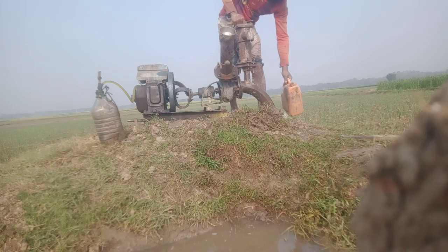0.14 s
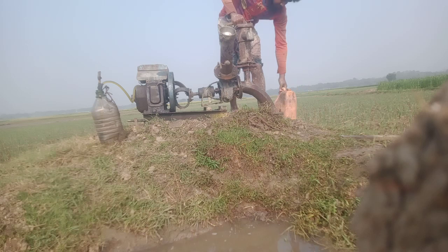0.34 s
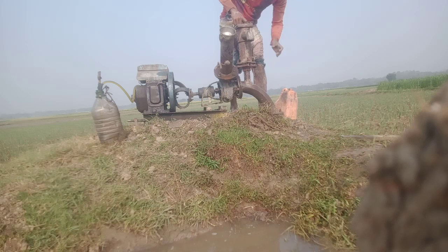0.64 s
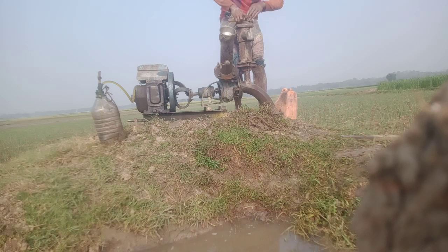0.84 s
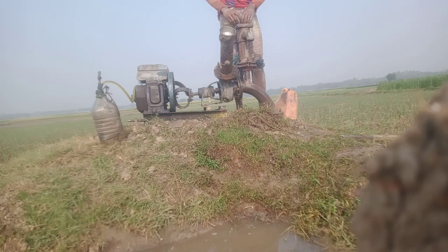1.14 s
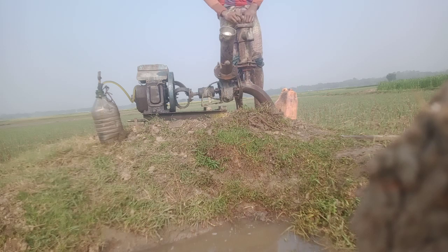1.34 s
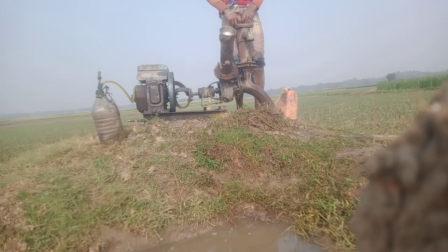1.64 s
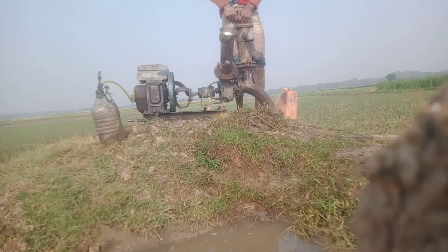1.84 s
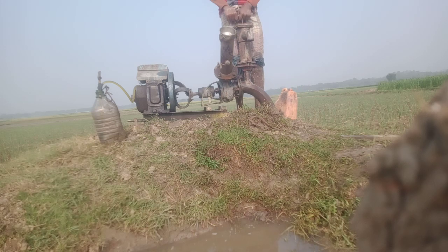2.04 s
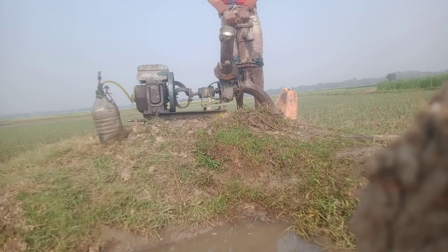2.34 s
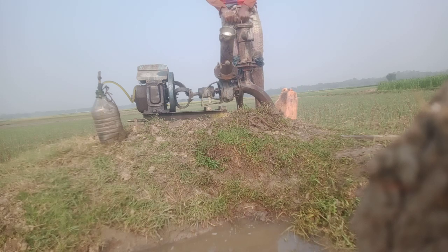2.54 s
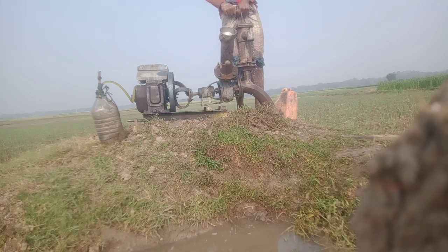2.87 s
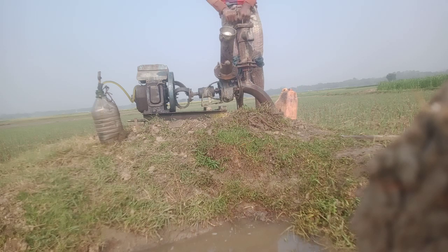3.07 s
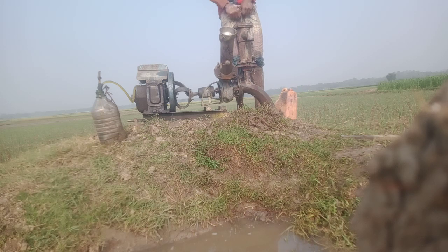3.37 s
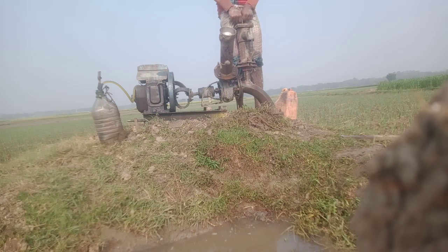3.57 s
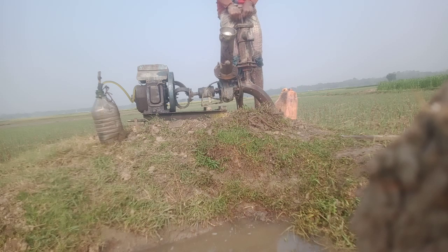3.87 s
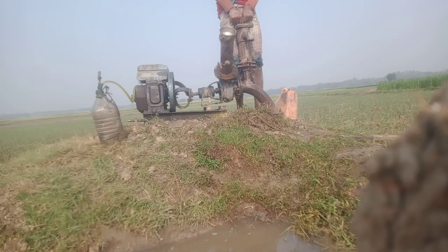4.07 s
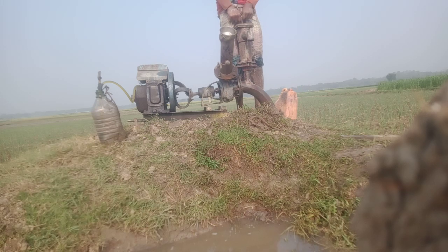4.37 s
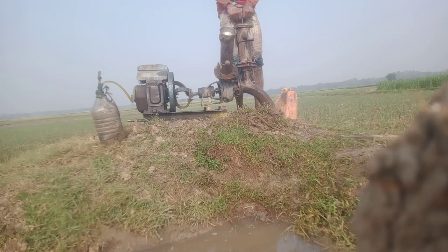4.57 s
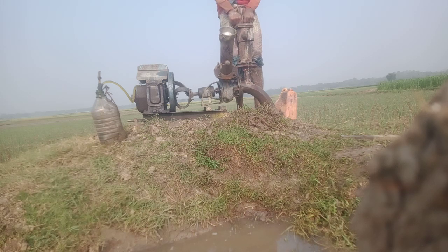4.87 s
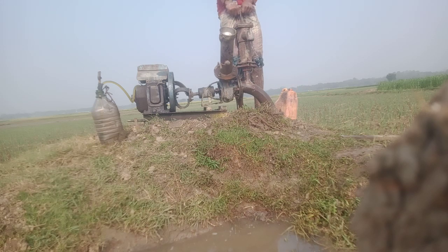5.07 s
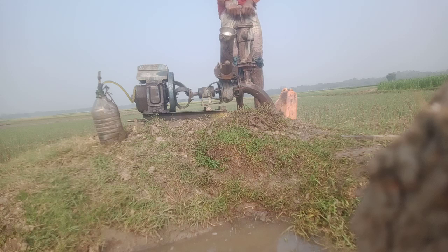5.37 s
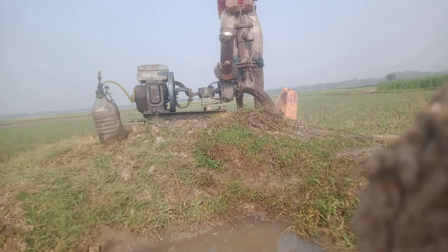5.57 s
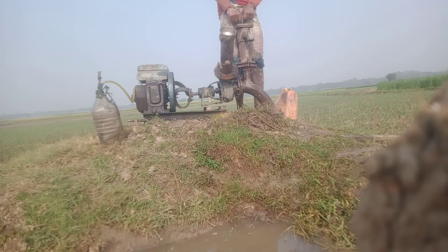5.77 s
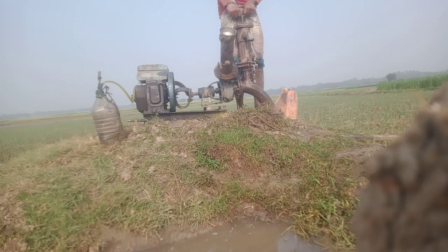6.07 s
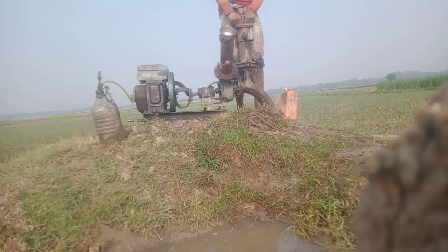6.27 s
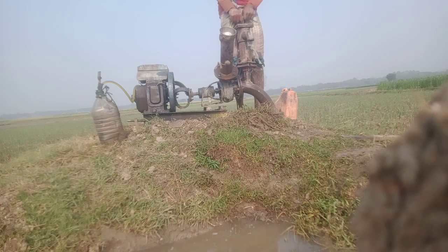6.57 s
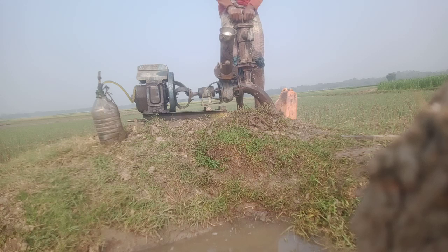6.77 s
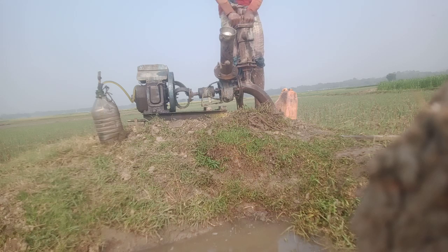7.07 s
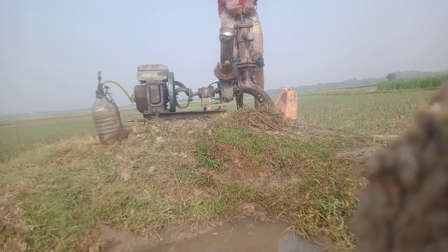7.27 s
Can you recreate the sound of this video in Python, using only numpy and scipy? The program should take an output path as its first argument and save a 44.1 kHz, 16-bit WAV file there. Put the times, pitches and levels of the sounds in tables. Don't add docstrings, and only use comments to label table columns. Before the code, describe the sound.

A dry, open field heard through a phone microphone a few metres from a loose iron hand pump. At 0 s a hard metal clink lands, followed by small ticks until 0.2 s. Until 1.8 s it is mostly quiet: soft wind rumble, faint hush, thin rising bird whistles around 0.3 and 1.1-1.3 s, and occasional clinks near 0.75, 0.85, 1.06 and 1.45 s. From about 1.85 s pumping starts and continues briskly, roughly four strokes a second. Each stroke mixes clanking handle and pins, rattling iron, a hollow low note sliding upward, a short airy hiss and a dull valve thump. Brief water bubbles chirp through it. Wind swells around 4.4 s. Clanks grow heavier from 4.8 s, with strong hits near 5.5 and 7.15 s, a scrape around 5.9 s, and rising gurgles at 5.8, 6.25 and 7.2 s. The pumping is still going at 7.4 s.

```python
import sys
import numpy as np
from scipy import signal
from scipy.fft import rfft, irfft, next_fast_len
from scipy.io import wavfile
from scipy.ndimage import uniform_filter1d

SR = 44100
rng = np.random.default_rng(int(sys.argv[2]) if len(sys.argv) > 2 else 0)


def convert_level_to_amplitude(level_db):
    exponent = np.asarray(level_db, float) / 20
    return 10 ** exponent


def bounce(signal):
    frames = np.transpose(np.atleast_2d(signal))
    limited = np.clip(frames, -1, 1)
    pcm = np.round(limited * 32767).astype(np.int16)
    wavfile.write(sys.argv[1], SR, pcm)


N = 327215
PUMPING_FROM = 1.8


def evened(x):
    return x / np.sqrt(np.mean(x ** 2) + 1e-20)


def coloured(x, points):
    hz, db = np.transpose(points)
    size = next_fast_len(len(x))
    log_hz = np.log(np.fft.rfftfreq(size, 1 / SR) + 1)
    gain = convert_level_to_amplitude(np.interp(log_hz, np.log(hz), db))
    return evened(irfft(rfft(x, size) * gain, size)[:len(x)])


def add(mix, s, sound):
    part = mix[round(s * SR):][:len(sound)]
    part += sound[:len(part)]


def resonate(x, hz, width):
    turn = np.exp(2j * np.pi * np.cumsum(hz * np.ones(len(x))) / SR)
    r = np.exp(-np.pi * width / SR)
    smooth = signal.lfilter([1 - r], [1, -r], x / turn + 1e-18)
    return 2 * (turn * smooth).real


def lumps(seconds):
    size = round(seconds * SR)
    once = uniform_filter1d(rng.standard_normal(N), size)
    return evened(uniform_filter1d(once, size))


def span(t, start, stop, rise, fall):
    return np.interp(t, [start - rise, start, stop - fall, stop + fall], [0, 1, 1, 0])


def glide(start, stop, first_hz, last_hz, width, clean=0.69):
    t = np.arange(round((stop - start) * SR)) / SR
    done = t / (stop - start)
    hz = first_hz + (last_hz - first_hz) * done
    flow, surge = rng.standard_normal((2, len(t)))
    flow = flow * convert_level_to_amplitude(4 * evened(uniform_filter1d(surge, 600)))
    rough = evened(resonate(resonate(flow, hz, width), hz, 5.4 * width))
    steady = np.sin(2 * np.pi * np.cumsum(hz) / SR)
    return evened(rough + clean * steady) * np.sin(np.pi * done ** .6) ** .7


def swell(t, rise_s, t60):
    return (1 - np.exp(-(t / rise_s) ** 2)) * convert_level_to_amplitude(-60 * t / max(t60, .02))


def shank(contact, hz):
    return signal.lfilter([1], np.r_[1, np.zeros(int(SR / hz)), -.72], contact)


# [t/s, rattle level/dB, wind level/dB]
WORK = [(0, -34.5, -42), (.24, -65, -49.5), (.4, -54.5, -47.5), (.55, -60, -48.5), (1.0, -58, -45.5),
        (1.3, -59, -51), (1.66, -71.5, -41.5), (1.82, -56, -44.5), (1.899, -37, -47.5), (3, -39.5, -46.5),
        (4.4, -40, -35), (4.899, -38, -47), (7.42, -40, -55)]


def work(column):
    rows = np.array(WORK)
    return convert_level_to_amplitude(np.interp(np.arange(N) / SR, rows[:, 0], rows[:, column]))


# [f/Hz, level/dB]
WIND = [(30, -38.5), (60, -14), (110, -1.5), (190, -9), (280, -15.5), (450, -107)]
# [f/Hz, level/dB]
AIR = [(620, -43), (950, -15.5), (1420, -7.5), (2600, -8.5), (4500, -17.5), (9000, -42.5)]
AIR_DB = -64.5


def wind():
    rumble = coloured(rng.standard_normal(N) * convert_level_to_amplitude(6.1 * lumps(0.012)), WIND) * work(column=2)
    hush = coloured(rng.standard_normal(N), AIR) * convert_level_to_amplitude(3.5 * lumps(.03))
    whistle_hz = 2900 + 500 * lumps(.1)
    whistle = evened(resonate(resonate(hush, whistle_hz, 200), whistle_hz, 200))
    return rumble + convert_level_to_amplitude(AIR_DB) * (hush + .35 * whistle)


# [start t/s, stop t/s, first f/Hz, last f/Hz, level/dB]
BIRDS = [
    (0.196, 0.296, 3380, 3370, -69),
    (.32, 0.402, 2100, 2830, -62),
    (1.104, 1.195, 3290, 4700, -64),
    (1.186, 1.273, 2820, 3800, -61.5),
    (1.606, 1.68, 3020, 3640, -71),
    (1.688, 1.735, 7000, 8000, -75),
]


def birds():
    out = np.zeros(N)
    for start, stop, first_hz, last_hz, db in BIRDS:
        add(out, start, convert_level_to_amplitude(db) * glide(start, stop, first_hz, last_hz, 120, .8))
    return out


# [start t/s, stop t/s, first f/Hz, last f/Hz, level/dB]
POCKETS = [(1.883, 1.949, 847, 1027, -41), (1.965, 2.016, 1260, 1360, -53), (2.327, 2.429, 478, 635, -45),
           (2.793, 2.853, 521, 610, -37), (3.044, 3.122, 504, 635, -39), (3.587, 3.656, 492, 676, -46),
           (4.118, 4.183, 595, 947, -37.5), (4.395, 4.436, 685, 760, -40.5), (4.542, 4.629, 875, 982, -40),
           (4.975, 5.038, 850, 1030, -41), (5.079, 5.16, 992, 844, -44), (5.152, 5.238, 440, 740, -36),
           (5.236, 5.324, 849, 1000, -40), (5.342, 5.414, 530, 680, -38), (5.462, 5.506, 560, 690, -39.5),
           (6.327, 6.375, 616, 746, -38.5), (6.328, 6.442, 880, 1000, -39), (6.732, 6.797, 857, 600, -43),
           (6.843, 6.903, 754, 933, -31.5)]


def pockets():
    out = np.zeros(N)
    for start, stop, first_hz, last_hz, db in POCKETS:
        add(out, start, convert_level_to_amplitude(db) * glide(start, stop, first_hz, last_hz, 52, 0.82))
    return out


# [start t/s, stop t/s, first f/Hz, last f/Hz, level/dB]
GURGLES = [
    (5.793, 5.854, 632, 939, -28),
    (6.234, 6.298, 760, 874, -37),
    (7.145, 7.228, 691, 1010, -33.5),
    (7.215, 7.304, 347, 574, -39.5),
    (7.316, 7.473, 372, 587, -39),
]


def gurgles():
    out = np.zeros(N)
    for start, stop, first_hz, last_hz, db in GURGLES:
        add(out, start - .01, convert_level_to_amplitude(db) * glide(start, stop, first_hz, last_hz, 42, 2.0))
    return out


# [f/Hz, level/dB]
PUFF = [(1500, -30), (2700, -3), (5200, -17), (9000, -30), (11000, -37), (15600, -33)]
# [start t/s, stop t/s, level/dB]
PUFFS = [(1.888, 2, -50), (2.047, 2.12, -54), (2.192, 2.25, -54), (2.43, 2.534, -55.5), (2.544, 2.592, -51),
         (2.648, 2.712, -52.5), (2.876, 2.93, -58), (3.151, 3.31, -55), (3.359, 3.516, -56.5),
         (3.625, 3.659, -46.5), (3.897, 3.974, -59.5), (4.144, 4.213, -55), (4.396, 4.494, -54),
         (4.692, 4.794, -56), (4.957, 5.072, -53.5), (5.26, 5.32, -57.5), (5.536, 5.676, -56),
         (5.86, 5.937, -53), (6.105, 6.15, -61), (6.376, 6.478, -54), (6.624, 6.71, -56),
         (6.884, 6.975, -54.5), (7.15, 7.236, -55.5)]


def puffs():
    level, t = np.zeros(N), np.arange(9000) / SR
    for start, stop, db in PUFFS:
        add(level, start, convert_level_to_amplitude(db + 1.5 - 41 * t) * span(t, 0.0011, stop - start, 0.001, 0.017))
    hiss = coloured(rng.standard_normal(N), PUFF) * convert_level_to_amplitude(4.95 * lumps(0.0041))
    return convert_level_to_amplitude(6.0) * level * hiss


# [t/s, peak level/dB, f/Hz]
THUMPS = [(2.053, -22, 125), (2.311, -14, 203), (2.538, -15, 129), (2.776, -12.5, 180), (2.926, -14.5, 76),
          (3.013, -15, 159), (3.902, -18.5, 181), (4.052, -9.5, 148), (4.275, -21, 157),
          (4.844, -15.5, 170), (5.117, -12.5, 162), (5.397, -12.5, 137), (5.68, -19, 173),
          (5.953, -11.5, 136), (6.231, -14, 131), (6.498, -11.5, 139), (6.774, -10.5, 143),
          (7.049, -8, 154), (7.318, -6.5, 163.5)]


def valve():
    out, t = np.zeros(N), np.arange(5000) / SR
    for s, db, hz in THUMPS:
        shape = (1 - np.exp(-(t / 0.0043) ** 2)) * np.exp(-t / 0.006)
        add(out, s - .003, convert_level_to_amplitude(db + 3.5) * shape * np.sin(2 * np.pi * hz * t))
    return signal.sosfilt(signal.butter(2, 75, "high", fs=SR, output="sos"), out)


# [start t/s, stop t/s, level/dB]
STROKES = [(1.855, 2.012, -34.5), (2.143, 2.282, -31.5), (2.405, 2.561, -37.5), (2.604, 2.788, -30),
           (2.811, 2.994, -32), (3.063, 3.311, -34.5), (3.354, 3.536, -34), (3.6, 3.751, -30),
           (3.885, 4.02, -32), (4.125, 4.257, -27), (4.343, 4.567, -29), (4.644, 4.833, -30.5),
           (4.873, 5.13, -30), (5.183, 5.352, -30), (5.471, 5.694, -33), (5.781, 5.953, -31.5),
           (6.021, 6.17, -29), (6.322, 6.496, -25.5), (6.603, 6.788, -33.5), (6.84, 6.963, -32),
           (7.096, 7.319, -35.5)]
FIRST_HZ, LAST_HZ, THIRD_DB = 264.2, 347.6, -47.5
SAG_HZ_PER_S = 5.3


def strokes():
    out = np.zeros(N)
    for start, stop, db in STROKES:
        sag_hz = SAG_HZ_PER_S * (start - PUMPING_FROM)
        first_hz, last_hz = FIRST_HZ - sag_hz, LAST_HZ - sag_hz
        add(out, start - .01, convert_level_to_amplitude(db) * glide(start, stop, first_hz, last_hz, 29, 1.21))
        add(out, start, convert_level_to_amplitude(THIRD_DB) * glide(start, stop, 3.46 * first_hz, 3.304 * last_hz, 55))
    return out


# [t/s, peak level/dB, f/Hz]
KNOCKS = [(1.84, -37.5, 276.6), (2.396, -29, 258.5), (2.599, -32.5, 258), (2.633, -21, 269),
          (2.816, -31, 237), (3.071, -26, 256), (3.108, -22.5, 271), (3.353, -28, 281.7), (3.548, -19, 274),
          (3.927, -33.5, 273.2), (4.407, -34, 274.7), (4.651, -31.5, 259.8), (4.679, -23, 267),
          (4.902, -34.5, 260.5), (4.918, -23.5, 269), (5.2, -29, 262.7), (5.236, -23.5, 267.7),
          (5.483, -24.5, 252), (5.761, -27, 252.4), (5.806, -29.5, 247.7), (6.063, -28, 259.4),
          (6.306, -32, 256.4), (6.341, -21.5, 257.7), (6.611, -28, 287.6), (6.886, -25, 263),
          (7.154, -24, 272)]
# [t/s, peak level/dB, f/Hz]
TOP_KNOCKS = [(2.056, -44.5, 358), (2.154, -19, 270), (2.326, -24.5, 302), (2.542, -33.5, 314.4),
              (2.774, -22.5, 311), (3.02, -19, 304), (3.276, -33.5, 315.4), (3.525, -27, 326),
              (3.712, -49, 341.5), (3.754, -27, 346), (3.987, -29.5, 303), (4.306, -36, 330),
              (4.543, -29.5, 348), (4.969, -21.5, 274), (5.139, -8.5, 303), (5.403, -26, 312),
              (6.192, -31, 315), (6.229, -30, 332.4), (6.252, -8, 310), (6.793, -10.5, 306),
              (7.052, -14, 344), (7.27, -38, 334)]
# [t/s, peak level/dB, f/Hz]
REST_KNOCKS = [
    (0.005, -33.5, 252.4),
    (0.104, -42.5, 273),
    (0.76, -52.5, 276),
    (0.86, -51.5, 287),
    (1.068, -38.5, 276),
    (1.109, -52.5, 278),
    (1.439, -42, 283.6),
    (1.486, -39.5, 279),
]
# [t/s, peak level/dB, f/Hz,
# 60 dB decay t/s]
SHORT_KNOCKS_AND_POPS = [(0.598, -45, 538, 0.055), (2.153, -43.5, 487, 0.17), (3.622, -23, 624, 0.029),
                         (4.137, -27, 654, 0.022), (4.606, -24.5, 298, 0.047), (4.811, -23.5, 318, 0.048),
                         (5.574, -27.5, 285, 0.055), (5.678, -26.5, 297, 0.052), (6.065, -30.5, 643, 0.056),
                         (6.302, -16.5, 592, 0.029), (6.845, -38.5, 603, 0.085), (7.339, -21.5, 278, 0.045)]
# [t/s, peak level/dB, f/Hz, 60 dB decay t/s]
HANDLE = [
    (0.014, -65, 3150, 0.56),
    (.755, -62.5, 3360, 0.33),
    (1.067, -41, 3170, 0.13),
]
LOW_T60, TOP_T60, REST_T60 = 0.17, 0.11, 0.2
SLOSH = 0.85


def knocks():
    out, t = np.zeros(N), np.arange(13000) / SR
    notes = [row + (REST_T60,) for row in REST_KNOCKS] + SHORT_KNOCKS_AND_POPS + HANDLE
    for rows, t60 in [(KNOCKS, LOW_T60), (TOP_KNOCKS, TOP_T60)]:
        notes += [row + (t60 * convert_level_to_amplitude(-SLOSH * (row[1] + 28.0)),) for row in rows]
    for s, db, hz, t60 in notes:
        bend = (s > PUMPING_FROM) * 0.748 * (t - .04) * t
        turn = 2 * np.pi * hz * (t + bend)
        third = convert_level_to_amplitude(-13.0 - 1360 * t) * np.sin(2.23 * turn)
        add(out, max(s - .006, 0), convert_level_to_amplitude(db + 13.5) * swell(t, 0.0053, t60) * (np.sin(turn) + third))
    return out


# [f/Hz, width f/Hz, level/dB]
IRON = [(994, 70, -20.5), (1160, 200, -1.5), (1450, 570, 12.5), (2200, 102, 2), (2400, 340, 11.5),
        (2950, 190, 4.5), (3557, 370, -10), (3810, 260, -9), (4087, 240, -6), (4950, 230, -20.5),
        (5940, 500, -15), (6736, 350, -19)]
# [f/Hz, level/dB]
RATTLE = [(240, 16.5), (400, 15), (620, -6), (980, 3.5), (1200, -8.5), (1500, 7.5), (1970, -5.5),
          (2180, -14), (4010, -13), (12000, -99.5), (15600, -74.5), (22000, -120)]


def rattle(blows):
    shaken = rng.standard_normal(N) * convert_level_to_amplitude(3.2 * lumps(.014))
    shivers = np.zeros(N)
    for hz, width, db in IRON[:-1]:
        mode = signal.iirpeak(hz, hz / (width + 60), SR)
        ringing = evened(signal.lfilter(*mode, signal.lfilter(*mode, shaken)))
        shivers += convert_level_to_amplitude(db + 4.2 * lumps(.018)) * ringing
    after = np.sqrt(signal.lfilter([1], [1, -np.exp(-1 / (0.06 * SR))], abs(blows)))
    loose = evened(1.77 * coloured(shaken, RATTLE) + evened(shivers))
    return loose * evened(1.2 + evened(after)) * work(column=1)


def iron(contact, hz, treble_db):
    t = np.arange(3000) / SR
    iron_hz, width, iron_db = np.transpose(IRON)[:, :, None]
    spot_db = 4 * rng.standard_normal((len(IRON), 1))
    detune = .015 * rng.standard_normal((len(IRON), 1))
    db = iron_db + spot_db + (iron_hz > 3400) * 0.81 * (treble_db + 32.0)
    modes = convert_level_to_amplitude(db) * np.exp(-1.8 * width * t) * np.sin(2 * np.pi * iron_hz * (1 + detune) * t)
    loudest = convert_level_to_amplitude(10.0) * np.exp(-130 * t) * np.sin(2 * np.pi * hz * t)
    ring = (modes.sum(0) + loudest) * (1 - np.exp(-t / .0006)) ** 2
    clatter = coloured(contact, [(330, -9.0), (560, 2.5)] + RATTLE[2:])
    return evened(signal.fftconvolve(contact, ring)[:len(contact)]) + convert_level_to_amplitude(-4.5) * clatter


# [f/Hz, level/dB]
PIN = [(900, -17), (1800, 2), (3500, -1.5), (7000, -15), (11000, -37.5), (16000, -41)]
# [t/s, peak level/dB]
PINS = [(0.0094, -26), (0.123, -39), (0.1365, -37), (0.172, -36), (0.1865, -39), (0.3094, -51),
        (0.4658, -47), (0.477, -51), (0.517, -54), (0.6439, -54), (0.748, -53), (0.8554, -31),
        (1.0326, -43), (1.0619, -23.5), (1.0944, -40), (1.1244, -49), (1.4213, -51), (1.51, -35),
        (1.7344, -54),
        (2.1233, -32), (2.1576, -43), (2.2744, -50), (2.312, -51), (2.4743, -33.5), (2.7154, -41),
             (2.756, -43), (3.0106, -39), (3.026, -27), (3.7514, -42), (4.0176, -37), (4.0645, -30),
             (4.139, -35), (4.3212, -32), (4.589, -29), (4.8414, -21.5), (4.949, -32.5), (5.097, -35),
             (5.4064, -44), (5.4304, -33), (5.456, -33), (5.7234, -38), (5.7705, -29), (5.8115, -29),
             (5.83, -36), (5.8745, -41), (5.9598, -32), (6.0504, -28), (6.126, -28), (6.268, -36),
             (6.589, -33.5), (6.751, -32), (6.778, -38), (6.787, -32), (6.8592, -32.5), (7.012, -36),
             (7.1412, -25), (7.393, -37)]
PIN_S = .004


def pins():
    out, t = np.zeros(N), np.arange(2048) / SR
    shape = np.exp(-t / PIN_S) + 0.28 * np.exp(-t / 0.02)
    for s, db in PINS:
        contact = shank(rng.standard_normal(len(t)), rng.uniform(900, 2600))
        tick = coloured(contact, PIN) * shape
        add(out, s - .001, convert_level_to_amplitude(db) * tick / abs(tick).max())
    return out


# [t/s, peak level/dB, f/Hz, 60 dB decay t/s]
RINGS = [(2.326, -28, 4550, 0.048), (2.332, -24, 3800, 0.038), (2.552, -15, 2343, 0.031),
         (2.558, -25, 2870, 0.071), (2.787, -24, 2400, 0.065), (3.127, -35, 7020.0, 0.05),
         (3.266, -33, 3700, 0.046), (3.397, -22, 2450, 0.045), (3.636, -26, 1475, 0.07),
         (3.864, -21, 2130, 0.039), (3.983, -24.5, 2380, 0.028), (4.14, -23, 2970, 0.039),
         (4.4, -24.5, 1520, 0.047), (4.465, -26, 2450, 0.061), (4.546, -30, 2200.0, 0.037),
         (4.651, -36, 2350, 0.029), (4.811, -13, 2148, 0.028), (4.9, -27, 1450, 0.049),
         (4.964, -20.5, 2087, 0.098), (4.976, -32.5, 3980, 0.073), (5.06, -18, 3020, 0.032),
         (5.365, -21, 2100, 0.046), (5.432, -29.5, 2240, 0.11), (5.514, -32, 1536, 0.049),
         (5.53, -21, 3550, 0.027), (5.53, -11.5, 3100, 0.023), (5.803, -12.5, 2950.0, 0.026),
         (5.887, -32, 4950.0, 0.047), (5.89, -15, 2853, 0.048), (6.062, -24, 2270, 0.051),
         (6.125, -25, 4040, 0.034), (6.128, -13, 2387, 0.038), (6.178, -30, 3870, 0.048),
         (6.346, -19.5, 1530, 0.031), (6.41, -19.5, 2450, 0.039), (6.448, -19, 2930, 0.04),
         (6.619, -23, 3820, 0.055), (6.874, -27, 1440, 0.059), (6.947, -27.5, 980, 0.092),
         (6.95, -29, 2404, 0.15), (7.025, -38, 2460, 0.27), (7.159, -24, 3410, 0.025),
         (7.159, -9, 2875, 0.026), (7.367, -39, 3820, 0.12)]
RING_RISE_S = 0.0035


def rings():
    out, t = np.zeros(N), np.arange(6000) / SR
    for s, db, hz, t60 in RINGS:
        add(out, s - .003, convert_level_to_amplitude(db + 4.5) * swell(t, RING_RISE_S, t60) * np.sin(2 * np.pi * hz * t))
    return out


# [start t/s, stop t/s, level/dB, loudest ring f/Hz]
GRINDS = [
    (2.995, 3.038, -34.5, 2400),
    (3.279, 3.319, -33.5, 952),
    (5.592, 5.641, -29.5, 1230),
    (5.866, 5.912, -27, 1253),
    (6.437, 6.46, -34.5, 1210),
]


def grinds():
    out, t = np.zeros(N), np.arange(8192) / SR
    fade = (1 - t / t[-1]) ** 2
    for start, stop, db, hz in GRINDS:
        contact = rng.standard_normal(len(t)) * span(t, 0.018, stop - start + 0.0061, 0.0099, 0.006)
        scrape = iron(contact, hz, -20.0) + convert_level_to_amplitude(-9.5) * coloured(contact, TICK)
        add(out, start - .011, convert_level_to_amplitude(db - 4) * fade * scrape)
    return out


# [f/Hz, level/dB]
TICK = [(3300, 5), (4600, -6.5), (7200, -11.5), (10000, -29.5), (15700, -42.5), (16100, -99)]
# [t/s, peak level/dB, loudest ring f/Hz]
TICKS = [(0.010, -17, 1410), (0.182, -31.5, 1387), (2.036, -24, 2430), (2.18, -25, 3765), (2.429, -20, 986),
         (2.546, -24, 2200), (2.652, -19.5, 1700), (2.756, -27.5, 2270), (2.879, -20, 1020),
         (3.127, -22.5, 3820), (3.395, -19, 2580), (3.620, -22, 1283), (3.788, -22, 2400),
         (3.863, -20, 1540), (4.051, -28, 1476), (4.231, -21.5, 1655), (4.509, -22, 1312),
         (4.782, -28.5, 1640), (4.844, -25, 1510), (4.964, -17, 2165), (5.346, -28.5, 937),
         (5.831, -21.5, 890), (5.974, -18, 1472), (6.178, -27.5, 3770), (6.452, -22, 2950),
         (6.722, -23, 2320), (6.95, -20.5, 2400), (7.116, -23.5, 2200), (7.160, -10.5, 1630),
         (7.271, -25, 3090)]
# [t/s, peak level/dB, loudest ring f/Hz]
TAPS = [(0.101, -29.5, 1246), (0.515, -50, 1510), (1.008, -45, 1510), (0.599, -39.5, 1450),
        (1.538, -40, 1465), (1.832, -32.5, 2545), (1.869, -29.5, 1633), (2.123, -29.5, 2790),
        (2.295, -27.5, 874), (2.556, -16, 2365), (2.789, -13.5, 910), (3.267, -17, 3686),
        (3.343, -19.5, 1450), (3.526, -25, 976), (3.541, -18.5, 2400), (3.589, -24, 1505),
        (3.979, -26, 2337), (4.272, -17, 2343), (4.31, -31.5, 1410), (4.591, -20, 2410), (4.684, -22, 1450),
        (4.858, -23.5, 4060), (4.984, -23.5, 2610), (5.42, -26, 2060), (5.530, -8, 1473),
        (5.69, -23.5, 2196), (6.408, -14, 2400), (6.906, -23, 1560), (7.367, -28.5, 1554),
        (7.392, -24, 1380)]
# [t/s, peak level/dB, loudest ring f/Hz]
CHATTERS = [(0.748, -33.5, 2336), (0.854, -28, 2060), (1.061, -25, 2915), (1.479, -23.5, 1588),
            (2.323, -11, 830), (3.748, -19, 2084), (4.117, -21, 1496), (4.37, -18.5, 1410),
            (4.542, -18.5, 2200), (4.646, -16, 2400), (5.477, -20.5, 2035), (5.802, -14, 2336),
            (5.886, -17, 2970), (6.064, -13.5, 2814), (6.126, -27.5, 2400), (6.223, -28, 1757),
            (6.613, -13, 3135), (6.845, -25, 804), (7.019, -26, 1960), (7.054, -18.5, 1450)]
# [t/s, peak level/dB, loudest ring f/Hz, chatter length t/s]
CLUNKS = [(1.272, -39.5, 1397, 0.0085), (1.434, -24.5, 1460, 0.021), (2.31, -21.5, 1015, 0.0078),
          (2.628, -28.5, 1490, 0.0088), (2.761, -23.5, 980, 0.042), (3.069, -26, 1040, 0.0042),
          (3.105, -25.5, 1450, 0.0013), (4.029, -25, 1746, 0.0017), (4.465, -30, 2300, 0.0075),
          (4.809, -17.5, 2172, 0.016), (4.915, -14.5, 1450, 0.0086), (5.058, -13.5, 1200, 0.012),
          (5.122, -23, 900, 0.025), (5.189, -18, 1470, 0.0084), (5.231, -19.5, 1353, 0.0091),
          (5.367, -14.5, 2140, 0.016), (5.614, -16, 1160, 0.018), (5.759, -27, 1367, 0.012),
          (5.945, -27, 2240, 0.025), (6.032, -21.5, 2770, 0.0033), (6.301, -19.5, 958, 0.017),
          (6.334, -18.5, 2060, 0.0076), (6.5, -29, 1000, 0.0047), (6.525, -15.5, 1440, 0.0053),
          (7.305, -28, 917, 0.048)]
TICK_S, TAP_S, CHATTER_S = 0.0065, 0.009, 0.017
TICK_TREBLE_DB, TAP_TREBLE_DB, CHATTER_TREBLE_DB, CLUNK_TREBLE_DB = -12.5, -17.5, -18.5, -31.5
TREBLE_LAG = 0.035


def clanks():
    out, t = np.zeros(N), np.arange(8192) / SR
    fade = (1 - t / t[-1]) ** 2
    blows = [row + (CLUNK_TREBLE_DB,) for row in CLUNKS]
    blows += [row + (TICK_S, TICK_TREBLE_DB) for row in TICKS]
    blows += [row + (TAP_S, TAP_TREBLE_DB) for row in TAPS]
    blows += [row + (CHATTER_S, CHATTER_TREBLE_DB) for row in CHATTERS]
    for s, db, hz, length, kind_db in blows:
        treble_db = kind_db - TREBLE_LAG * (db + 22)
        chatter = np.exp(-(t / length) ** 2) + 0.16 * np.exp(-t / 0.042)
        contact = rng.standard_normal(len(t)) * (1 - np.exp(-t / (0.075 * length))) * chatter
        body = iron(contact, hz, treble_db)
        tick = coloured(shank(contact, hz), TICK)
        blow = body / abs(body).max() + convert_level_to_amplitude(treble_db + 11.0) * tick / abs(tick).max()
        add(out, s - .002, convert_level_to_amplitude(db) * fade * blow)
    return out


def scene():
    blows = clanks() + grinds()
    field = wind() + birds()
    barrel = pockets() + gurgles() + puffs() + valve() + strokes() + knocks()
    linkage = rattle(blows) + pins() + rings() + blows
    return (field + barrel + linkage)[None]


def low_pass(x):
    return signal.sosfilt(signal.butter(12, 16800, fs=SR, output="sos"), x)


def record(dry):
    cut = signal.sosfilt(signal.butter(4, 58, "high", fs=SR, output="sos"), dry)
    top = signal.firwin(255, 16050, window=("kaiser", 9), fs=SR)
    mix = signal.oaconvolve(cut, top[None], "same")
    return low_pass(mix)


dry = scene()
out = record(dry)
bounce(out)
```